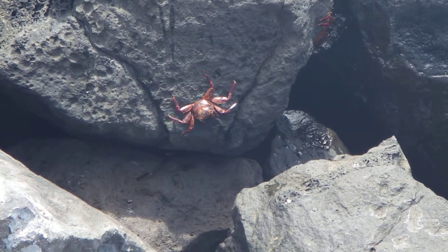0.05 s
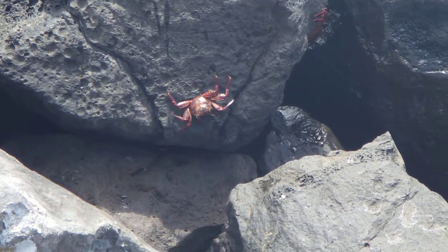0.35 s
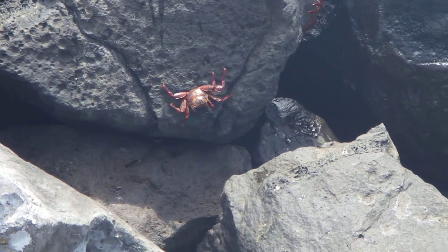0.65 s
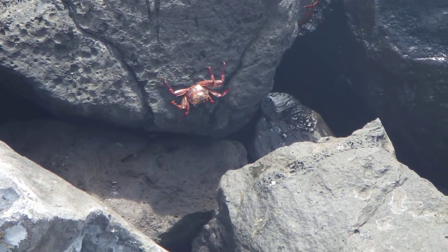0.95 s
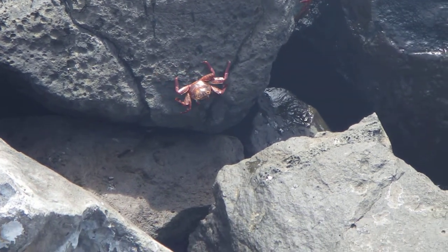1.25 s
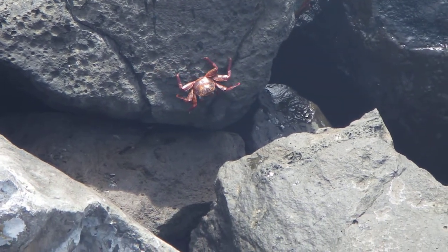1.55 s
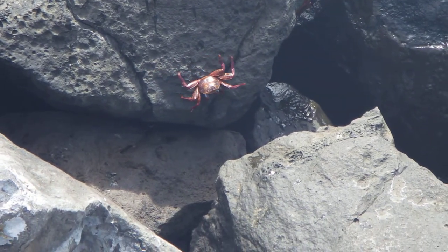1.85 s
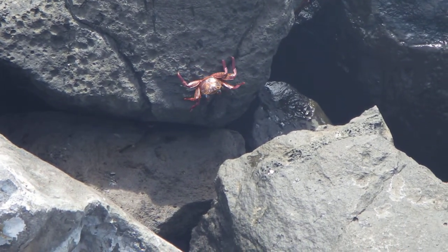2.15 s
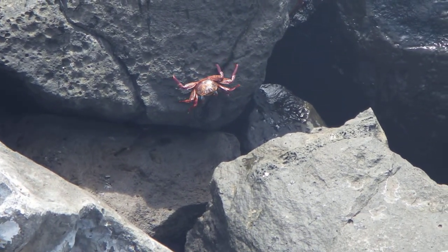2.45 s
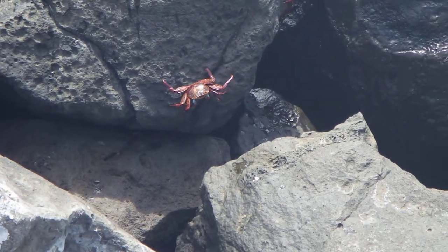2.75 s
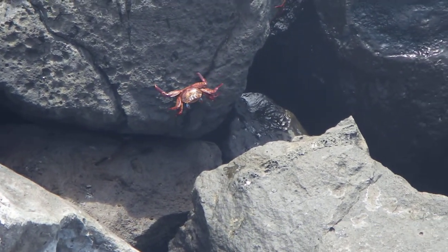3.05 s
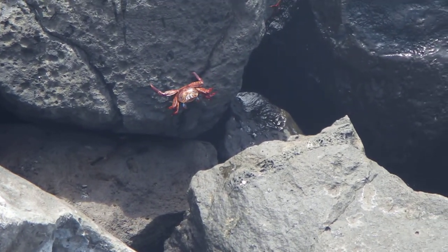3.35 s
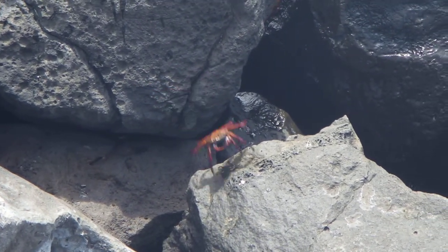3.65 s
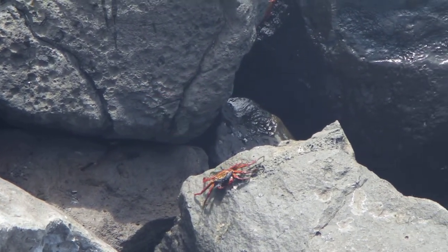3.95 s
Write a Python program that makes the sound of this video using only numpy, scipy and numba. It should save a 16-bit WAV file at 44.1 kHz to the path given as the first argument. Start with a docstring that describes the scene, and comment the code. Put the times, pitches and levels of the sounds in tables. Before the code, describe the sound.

Seawater washes and gurgles among shoreline boulders for the whole four seconds. Its foamy hiss swells slightly around 1 second and eases after 2, leaving the bubbling trickle more exposed. Wind bumps the microphone in a cluster from 0.8 to 1.8 seconds, with one sharp pop at 1.2 that briefly dips the water, then more softly near 2.8 and 3.2. Scattered drops tick faintly on rock.

```python
"""Boulder shoreline: a surge of seawater swells and drains with gurgling bubbles and fizzing foam.
Bubbles ring as decaying sines that rise in pitch, over a hiss. A few drops tick on the rock.
Wind puffs bump the microphone; the hardest, a single pressure swing, ducks the gain control."""
import sys
import numpy as np
from scipy import signal
from scipy.fft import rfft, irfft
from scipy.io import wavfile
from scipy.ndimage import uniform_filter1d
from numba import njit

SR = 44100
rng = np.random.default_rng(int(sys.argv[2]) if len(sys.argv) > 2 else 0)


def inscribe(sig):
    """Save sig as 16-bit PCM at rate SR to the path in sys.argv[1].

    A 1-D sig is mono; a 2-D sig holds one channel per row.
    Samples are clipped to [-1, 1] before scaling.
    """
    pcm = np.round(np.clip(np.atleast_2d(sig).T, -1, 1) * 32767)
    wavfile.write(sys.argv[1], SR, pcm.astype(np.int16))


N = 176400


def undb(db):
    """Decibels to gain."""
    return 10 ** (np.asarray(db) / 20)


def unit(x):
    """Scale to rms 1."""
    return x / np.sqrt(np.mean(x ** 2))


def curve(rows):
    """Join (time_s, value) points by straight lines."""
    return np.interp(np.arange(N) / SR, *np.array(rows).T)


def colour(x, points):
    """Filter by a (freq_hz, gain_db) curve, rolled off below its first point; rms 1."""
    hz, db = np.array(points).T
    f = np.maximum(np.fft.rfftfreq(N, 1 / SR), 1)
    low_cut = 1 / np.sqrt(1 + (.7 * hz[0] / f) ** 4)
    gain = undb(np.interp(np.log(f), np.log(hz), db))
    return unit(irfft(rfft(x) * low_cut * gain, N))


def band_noise(hz, width_ratio):
    """Noise in one resonance with steep skirts; rms 1."""
    f = np.maximum(np.fft.rfftfreq(N, 1 / SR), 1)
    detuning = (f / hz - hz / f) / (2 * width_ratio)
    return unit(irfft(rfft(rng.standard_normal(N)) / (1 + detuning ** 2) ** 2, N))


def burst(envelope, hz, width_ratio):
    """Enveloped band noise, scaled to the envelope's energy."""
    noise = band_noise(hz, width_ratio) * envelope
    return noise * np.sqrt(np.sum(envelope ** 2) / np.sum(noise ** 2))


def flutter(rate_hz):
    """Random steps, smoothed twice; rms 1."""
    hold = int(SR / rate_hz)
    steps = rng.standard_normal(2000)[np.arange(N) // hold]
    return unit(uniform_filter1d(uniform_filter1d(steps, hold), hold))


@njit
def ring(start_sample, hz, cycles, amplitude):
    """Each bubble is a sine that swells quickly and rises in pitch as it dies."""
    glide_ratio, rise_cycles = .1, .35
    out = np.zeros(N)
    for k in range(len(start_sample)):
        start = int(start_sample[k])
        length = int(cycles[k] * SR / hz[k]) + 2
        turns = 0.
        for i in range(min(length, N - start)):
            turns += hz[k] * (1 + glide_ratio * i / length) / SR
            envelope = (1 - np.exp(-turns / rise_cycles)) * np.exp(-5 * i / length)
            out[start + i] += amplitude[k] * envelope * np.sin(2 * np.pi * turns)
    return out


def bubbles(lo_hz, hi_hz, mean_cycles, spread_db, count):
    """Bubble cloud, many weak and few strong, with an even spectrum; rms 1."""
    when, pitch, life, strength = rng.random((count, 4)).T
    hz = lo_hz * (hi_hz / lo_hz) ** (pitch ** .75)
    amplitude = undb(-spread_db * np.log(1 - .985 * strength)) * hz ** .9
    return unit(ring(when * N, hz, mean_cycles * (.5 + life), amplitude))


def bubbling():
    """Water gurgles and trickles in the gaps between the boulders."""
    # gurgle spectrum: freq_hz, gain_db
    spectrum = [(150, -31), (300, -29), (450, -12.5), (600, -11.5), (780, -17.5), (960, -21), (1130, -9),
                (1260, -2), (1430, -0.5), (1620, -6), (1950, -7.5), (2550, -17.5), (3200, -15.5),
                (3900, -6.5), (4400, -7), (5250, -13), (6150, -23.5), (7200, -27), (8000, -33), (9300, -35),
                (11000, -33), (12800, -39), (15500, -45)]
    # trickle strength: time_s, level_db
    trickle = [(0, -2), (.7, 0.5), (1.3, 0), (2.2, 0.1), (2.55, -0.7), (2.85, 1), (3.1, 1), (3.55, 1),
               (4, 1.7)]
    cloud = bubbles(lo_hz=248.7, hi_hz=15370, mean_cycles=15.8, spread_db=2.5, count=12000)
    hiss = undb(2) * rng.standard_normal(N)
    level_db = -25 + curve(trickle) + .97 * flutter(rate_hz=14)
    return colour(cloud + hiss, spectrum) * undb(level_db)


def rush():
    """Foam on the running surge: dense bursting bubbles over a hiss."""
    # foam spectrum: freq_hz, gain_db
    spectrum = [(150, -44), (300, -13.5), (430, -5), (560, 0), (740, -5.5), (960, -17), (1130, -8.5),
                (1290, 3), (1550, -7), (1900, -12.5), (2500, -9.5), (3400, -4), (4100, -3.5), (5150, -6),
                (6150, -22), (7100, -12), (8100, -19), (9400, -27.5), (11000, -25), (12900, -39),
                (15500, -44)]
    # water surge: time_s, strength_db
    surge = [(0, 0.5), (.4, 1), (.8, 2), (1.18, 2), (1.3, 1.5), (1.65, 1.1), (2.05, -0.36), (2.5, -2),
             (2.8, -1), (3.05, -4), (3.3, -1.5), (3.65, -3), (4, -2.4)]
    fizz = bubbles(lo_hz=274, hi_hz=16500, mean_cycles=4.74, spread_db=3, count=20000)
    hiss = undb(1.5) * rng.standard_normal(N)
    level_db = -24 + 1.85 * curve(surge) + .56 * flutter(rate_hz=22.35)
    return colour(fizz + hiss, spectrum) * undb(level_db)


def wind():
    """Fluttering gusts over a faint rumble."""
    # wind spectrum: freq_hz, gain_db
    spectrum = [(20, 3), (60, -6), (130, 2), (300, 2), (480, -1), (800, -25), (1600, -32), (5000, -60)]
    # gust strength: time_s, level_db
    gust_levels = [(0, 3.5), (.15, -4.5), (.6, -8), (.72, -1), (1.1, 5), (1.3, 3.5), (1.55, 5.5), (1.9, -3),
                   (2.1, -10), (2.5, -11), (2.8, 4.5), (3.1, -9.5), (3.35, 6), (3.52, -22), (3.7, -2.5),
                   (4, -15)]
    # rumble strength: time_s, level_db
    rumble_levels = [(0, 1), (2, 2), (2.75, 7), (4, 5)]
    air = colour(rng.standard_normal(N), spectrum)
    gusts = air * undb(-40.5 + curve(gust_levels) + 3.6 * flutter(rate_hz=35))
    rumble = band_noise(hz=33.7, width_ratio=1) * undb(-53 + curve(rumble_levels))
    return gusts + rumble


def puffs():
    """Wind puffs bump the microphone: brief swells of low noise."""
    # puffs: centre_s, level_db, band_hz, fade_s
    bumps = [(0.044, -30, 243, 0.0099), (0.841, -14, 387, 0.0025), (1.01, -18.5, 394, 0.006),
             (1.04, -29, 182, 0.012), (1.137, -13.5, 445, .005), (1.22, -11.5, 410, 0.0039),
             (1.244, -16, 480, 0.0035), (1.40, -24, 322, 0.02), (1.538, -14, 480, 0.0044),
             (1.577, -15.5, 423, 0.0073), (1.741, -21, 357, 0.0056), (1.809, -21.5, 422, 0.004),
             (2.177, -30, 357, 0.014), (2.428, -34.5, 330, .01), (2.599, -26, 188, 0.0041),
             (2.654, -36, 88, 0.0065), (2.787, -21, 400, 0.0036), (2.852, -19.5, 406, 0.0044),
             (2.866, -18, 410, 0.0075), (3.226, -19, 470, 0.0039), (3.244, -22, 326, 0.0056),
             (3.386, -34, 113, 0.0053), (3.763, -25, 106, 0.0028), (3.969, -26, 324, 0.0057)]
    t, out = np.arange(N) / SR, np.zeros(N)
    for centre_s, level_db, band_hz, fade_s in bumps:
        envelope = np.exp(-np.abs(t - centre_s) / fade_s)
        out += undb(level_db) * burst(envelope, band_hz, width_ratio=.52)
    return out


def drops():
    """Drops tick on the rock: narrow-band noise, fast rise and decay."""
    # drop impacts: start_s, level_db, pitch_hz, decay_s
    ticks = [(.24, -15.5, 1290, .005), (.375, -12, 1330, 0.0035), (.897, -21, 7100, .004),
             (.992, -17, 4230, .003), (1.866, -35, 11200, .003), (2.042, -22, 4930, 0.0013),
             (2.11, -17, 1450, .003), (2.581, -29, 7700, .002), (2.581, -30, 10800, 0.0022),
             (2.623, -37, 9000, 0.0018), (2.79, -38, 13700, .0025), (3.16, -30, 7760, .003),
             (3.236, -22, 2220, 0.0073), (3.488, -20, 1360, 0.011), (3.562, -15.5, 4420, .006),
             (3.709, -17, 4470, 0.003), (3.791, -18, 1330, .008)]
    rise_cycles = .8
    t, out = np.arange(N) / SR, np.zeros(N)
    for start_s, level_db, pitch_hz, decay_s in ticks:
        age_s = np.maximum(t - start_s, 0)
        envelope = (1 - np.exp(-age_s * pitch_hz / rise_cycles)) * np.exp(-age_s / decay_s)
        out += undb(level_db) * burst(envelope, pitch_hz, width_ratio=.1)
    return out


def wind_pop():
    """The hardest buffet: a single swing of pressure."""
    centre_s, pitch_hz, width_s, low_cut_hz = 1.19, 490, .0009, 200
    offset_s = np.arange(N) / SR - centre_s
    envelope = undb(-1.5) * np.exp(-(offset_s / width_s) ** 2)
    swing = -envelope * np.sin(2 * np.pi * pitch_hz * offset_s)
    return signal.sosfilt(signal.butter(2, low_cut_hz, "high", fs=SR, output="sos"), swing)


def gain_control(x):
    """Low thumps above the limit pull the gain down quickly; it then recovers."""
    limit_db, attack_s, release_s, sense_hz = -9, .0006, .13, 1000
    bass = signal.sosfilt(signal.butter(2, sense_hz, fs=SR, output="sos"), x)
    excess = np.maximum(np.abs(bass) / undb(limit_db) - 1, 0)
    fade = np.exp(-np.arange(N) / SR / release_s)
    held = np.maximum.accumulate(excess / fade, axis=-1) * fade  # decaying peak hold
    step = 1 - np.exp(-1 / (attack_s * SR))
    duck = signal.lfilter([step], [1, step - 1], held)
    return x / (1 + duck)


def scene():
    """Water and wind, mono."""
    return (bubbling() + rush() + drops() + wind() + puffs() + wind_pop())[None]


def record(dry):
    """Gain control, then a steep treble cut."""
    top_hz = 15700
    return signal.sosfilt(signal.ellip(10, .2, 80, top_hz, fs=SR, output="sos"), gain_control(dry))


dry = scene()
out = record(dry)
inscribe(out)
```